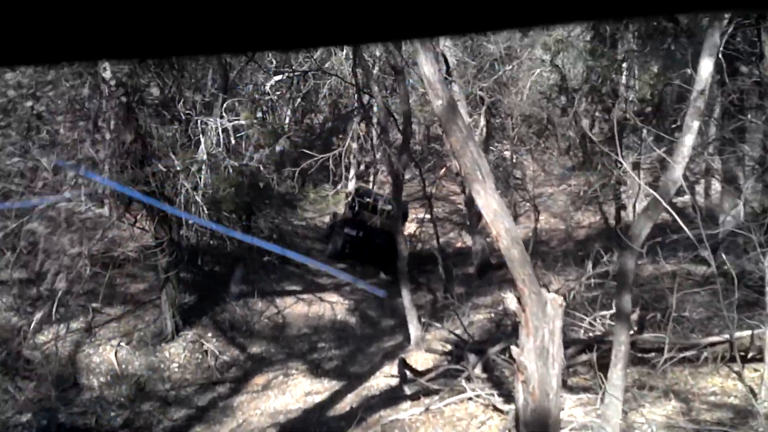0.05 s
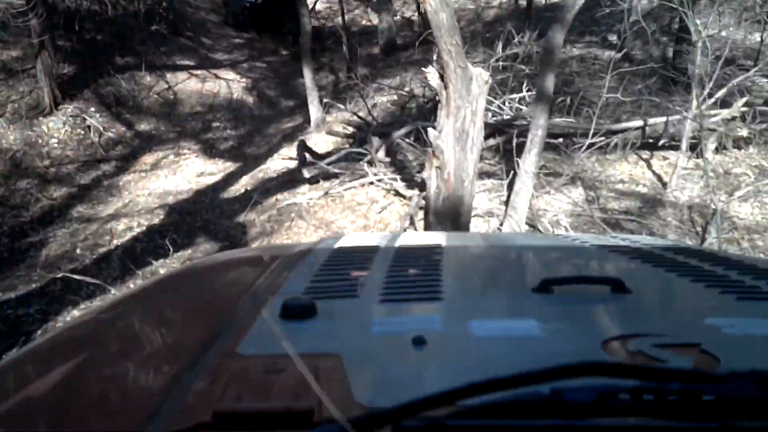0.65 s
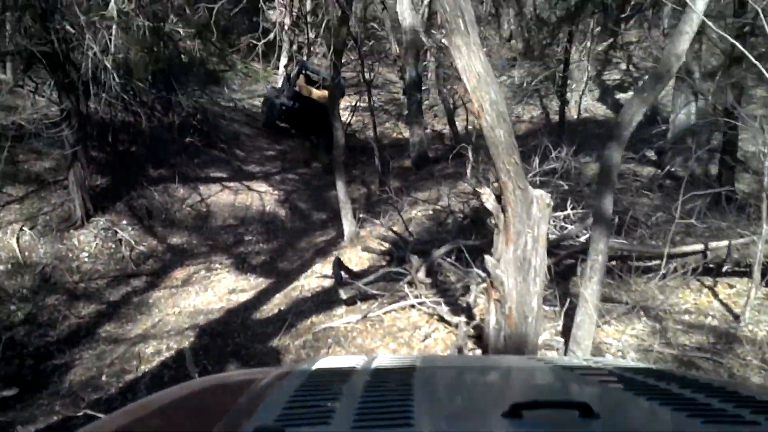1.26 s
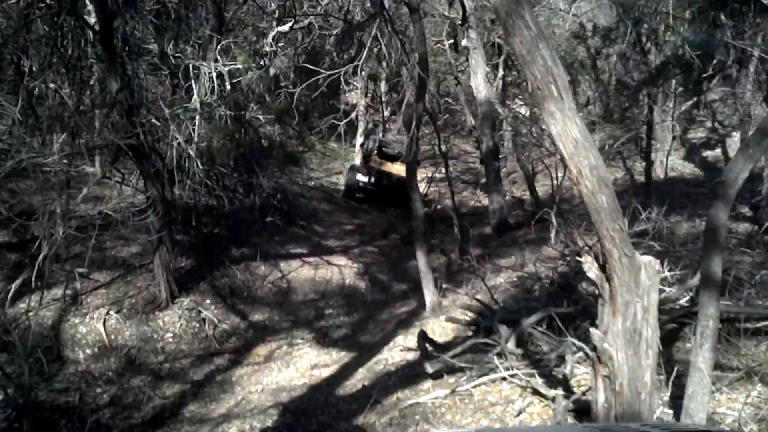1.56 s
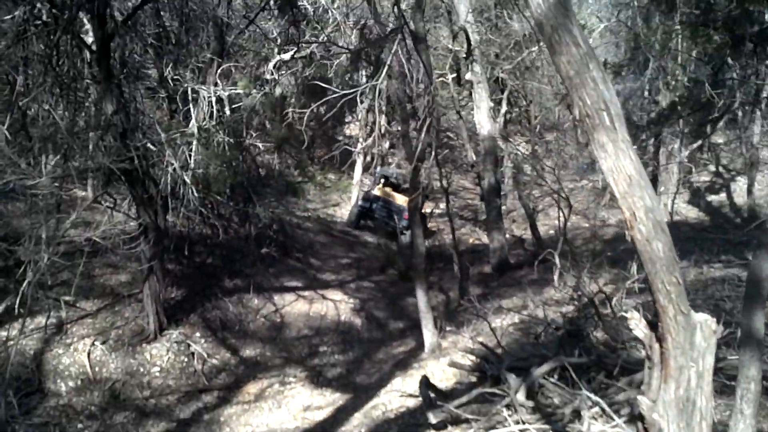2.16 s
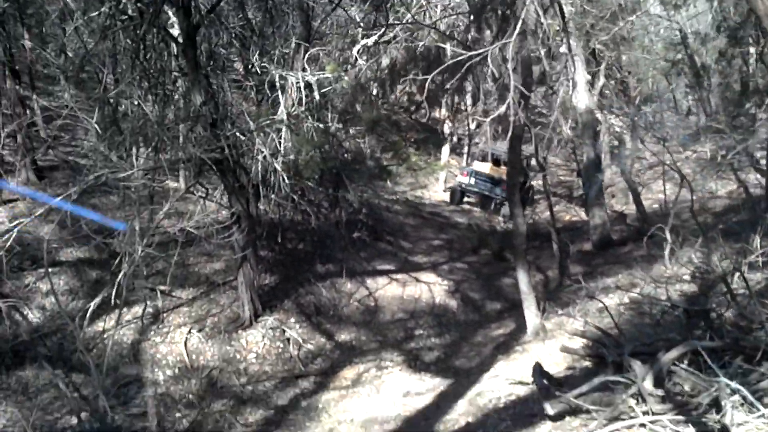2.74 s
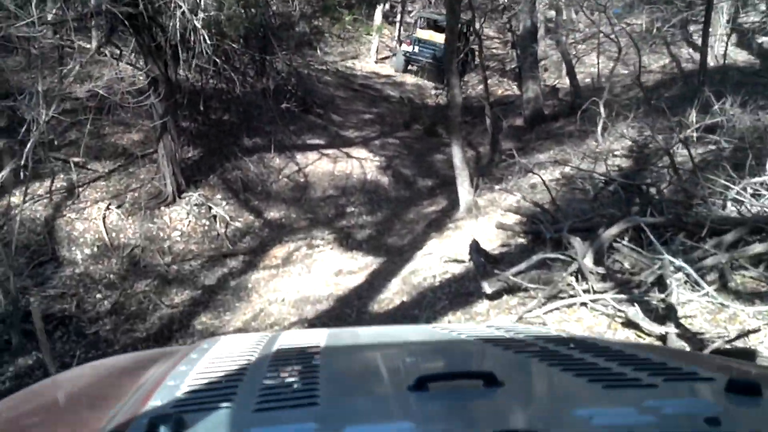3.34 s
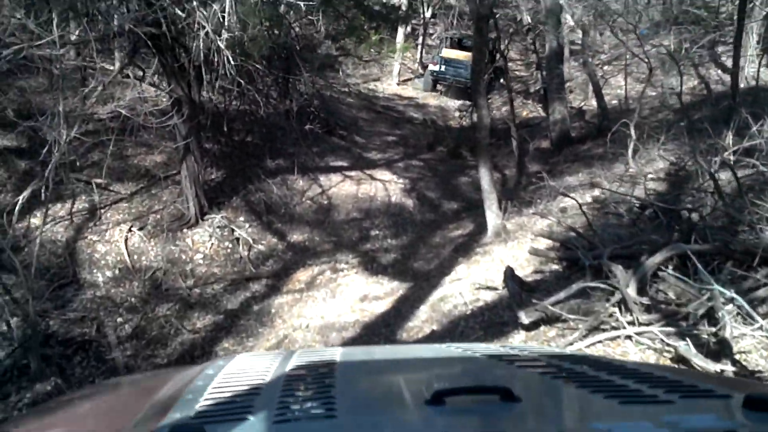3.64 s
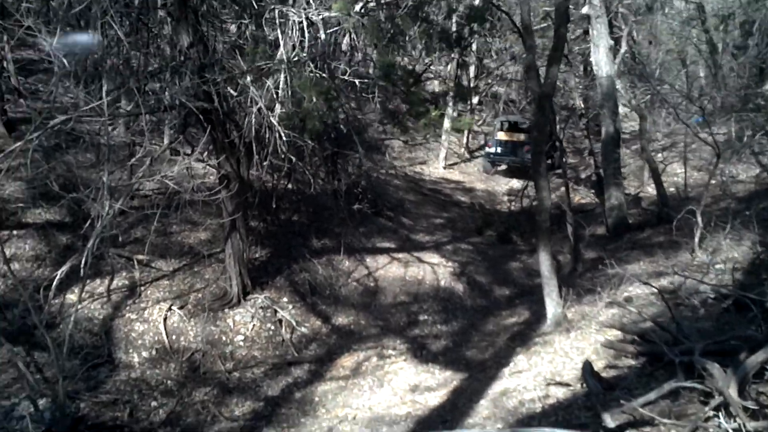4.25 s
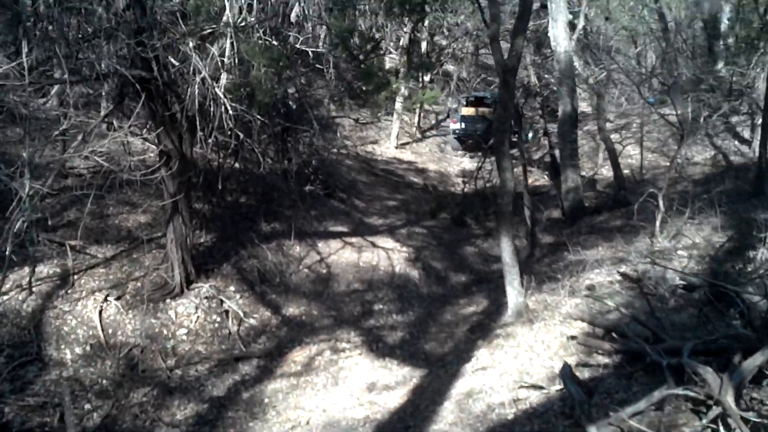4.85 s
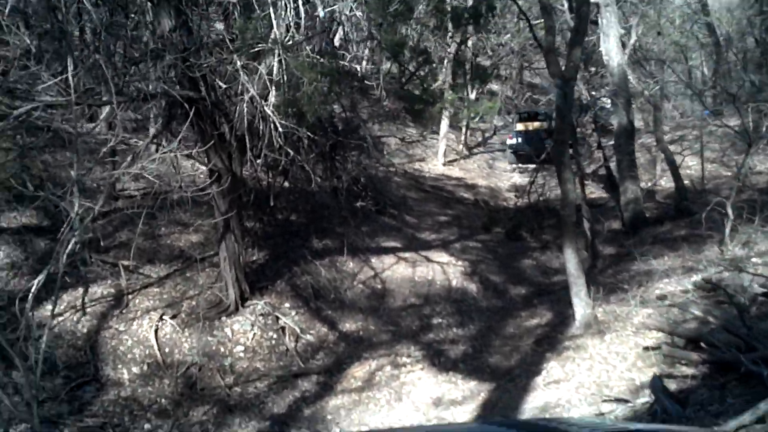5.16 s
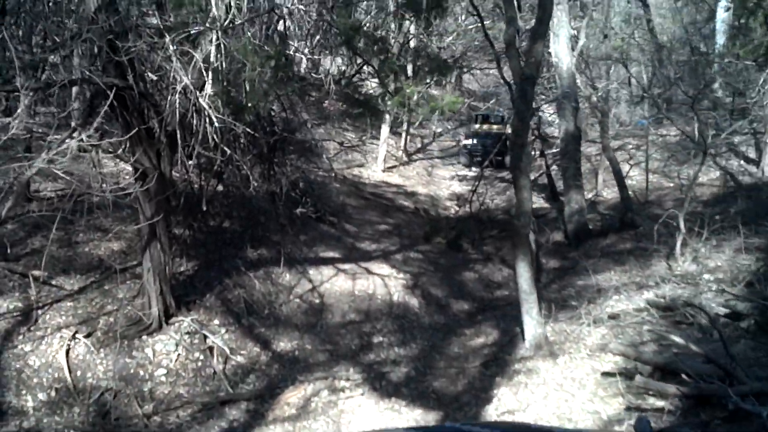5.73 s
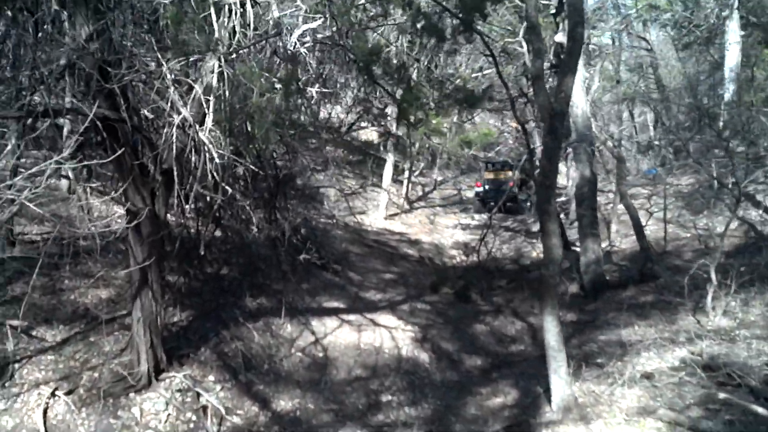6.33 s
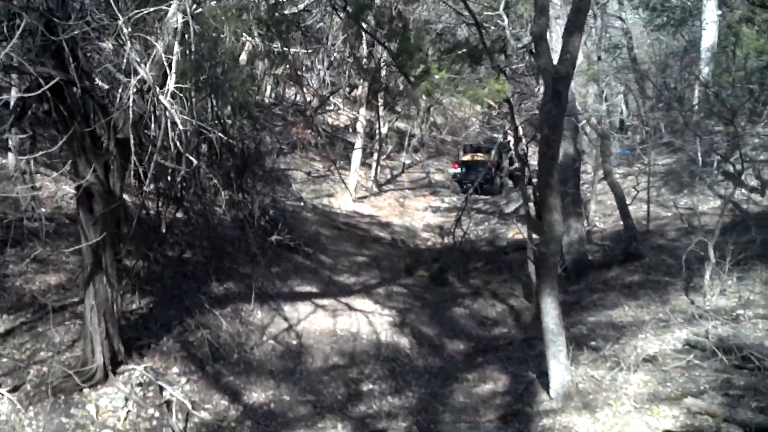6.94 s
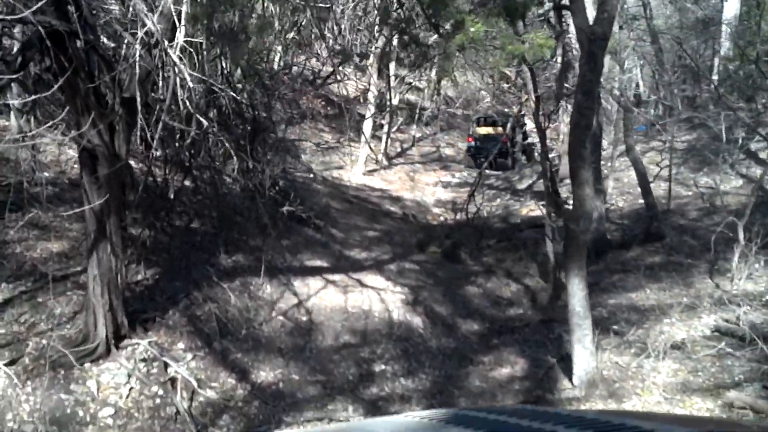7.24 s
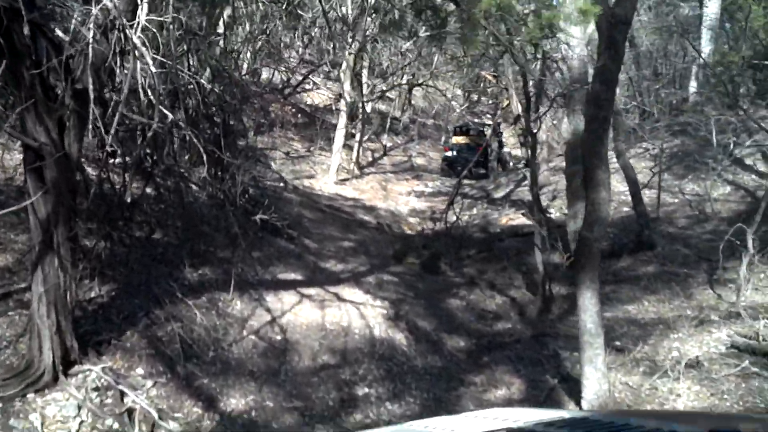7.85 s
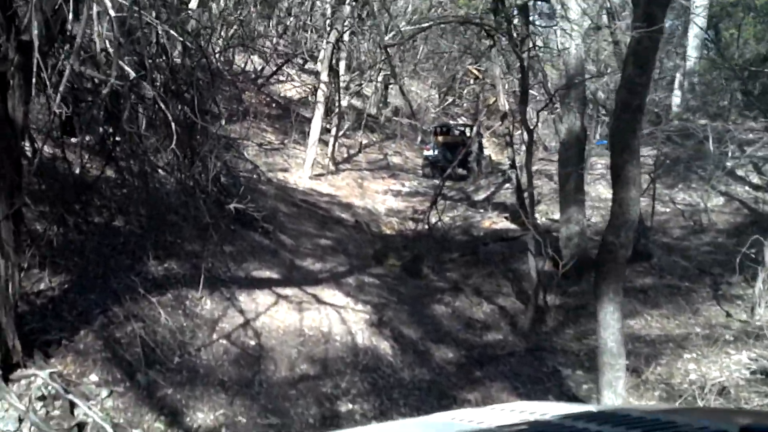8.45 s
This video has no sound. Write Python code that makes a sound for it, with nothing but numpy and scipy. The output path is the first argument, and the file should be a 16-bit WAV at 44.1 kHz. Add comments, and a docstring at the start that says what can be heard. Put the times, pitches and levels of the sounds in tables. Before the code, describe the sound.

An off-road vehicle's engine drones low as it crawls along a dirt trail, with twigs snapping, branches scraping and loose fittings knocking.

```python
"""Open off-road car on a wooded trail

Heard from the front seat at a crawl: the engine drones, the cab booms, tyres grind over dirt and dry leaves.
Twigs snap, branches scrape and foliage brushes the body; loose fittings knock, rubbing parts squeal.
A hand-held camera cross-feeds its two microphone ports; its gain ducks at hard knocks and creeps back."""
import sys
import numpy as np
from scipy import signal
from scipy.fft import rfft, irfft, next_fast_len
from scipy.io import wavfile
from scipy.ndimage import uniform_filter1d, map_coordinates

SR = 44100
rng = np.random.default_rng(int(sys.argv[2]) if len(sys.argv) > 2 else 0)


def inscribe(sig):
    """Save sig as 16-bit PCM at rate SR to the path in sys.argv[1].

    A 1-D sig is mono; a 2-D sig holds one channel per row.
    Samples are clipped to [-1, 1] before scaling.
    """
    pcm = np.round(np.clip(np.atleast_2d(sig).T, -1, 1) * 32767)
    wavfile.write(sys.argv[1], SR, pcm.astype(np.int16))


N = 378819


def amp(db):
    """Decibels to gain."""
    return 10 ** (np.asarray(db) / 20)


def unit(x):
    """x at rms 1."""
    return x / np.sqrt(np.mean(x ** 2) + 1e-20)


def along(points, hz):
    """Interpolate (f/Hz, value) points on a log axis."""
    freqs, values = np.transpose(points)
    return np.interp(np.log(hz + 1), np.log(freqs + 1), values)


def curves(rows):
    """One value per sample for each column after t/s."""
    times, *columns = np.transpose(rows)
    return [np.interp(np.arange(N) / SR, times, column) for column in columns]


def wobble(per_s):
    """Smooth random curve, per_s knots a second."""
    knots = rng.standard_normal(int(N * per_s / SR) + 4)
    return map_coordinates(knots, [np.arange(N) * per_s / SR])


def filtered(x, response):
    """x times a complex frequency response."""
    n = x.shape[-1]
    padded = next_fast_len(n + 4096)
    return irfft(rfft(x, padded) * response(np.fft.rfftfreq(padded, 1 / SR)), padded)[..., :n]


def coloured(x, spectrum):
    """x shaped by (f/Hz, level/dB) points, at rms 1."""
    return unit(filtered(x, lambda hz: amp(along(spectrum, hz))))


def loudness(x):
    """Rms of both channels over 6 ms."""
    power = uniform_filter1d(np.mean(x ** 2, axis=0), 265, mode="constant")
    return np.sqrt(np.abs(power) + 1e-12)


def add(track, at_s, x):
    """Mix x into the track."""
    part = track[:, max(round(at_s * SR), 0):][:, :x.shape[-1]]
    part += x[..., :part.shape[1]]


# likeness of the two ports: f/Hz, correlation
PORT_CORRELATION = [(60, 0.69), (150, 0.69), (350, 0.65), (600, 0.5), (1000, 0.69), (1600, 0),
                    (2500, 0.049)]
def port_noise(n):
    """White noise at two ports: alike in the bass, unrelated in the treble."""
    def mid_side(hz):
        angle = np.arccos(np.clip(along(PORT_CORRELATION, hz), -1, 1)) / 2
        return np.array([np.cos(angle), np.sin(angle)])
    mid, side = filtered(rng.standard_normal((2, n)), mid_side)
    return np.array([mid + side, mid - side])


def grains(per_s, spread_db, t60_s):
    """Envelope of many tiny fractures, at rms 1."""
    sizes = amp(spread_db * np.minimum(rng.exponential(size=N), 3))
    fractures = sizes * (rng.random(N) < per_s / SR)
    t = np.arange(SR // 10) / SR
    power = signal.fftconvolve(fractures ** 2, amp(-60 * t / t60_s) ** 2)[:N]
    return unit(np.sqrt(np.abs(power)))


def ringing(x, modes_db):
    """Each struck piece has its own modes: random peaks, wider towards the treble."""
    knots = rng.standard_normal(64)
    peaks = lambda hz: map_coordinates(knots, [22 * np.log1p(hz / 2500)])
    return filtered(x, lambda hz: amp(modes_db * np.minimum(hz / 1200, 1) * peaks(hz)))


def burst(spectrum, t60_s, attack_s, punch):
    """Hard first contact and a fast-dying ring; peak rms 1."""
    t = np.arange(SR // 4) / SR
    decay = amp(-60 * t / t60_s) + punch * np.exp(-t / 0.0013)
    ring = coloured(ringing(port_noise(len(t)), modes_db=3.5), spectrum)
    x = ring * (1 - np.exp(-t / attack_s)) * decay
    return x / loudness(x).max()


ENGINE_SPEED = [(0, 100.5), (.9, 98.5), (1.3, 99.6), (2.45, 99), (2.8, 95.3), (3.4, 98.8), (3.9, 97.3),
                (4.4, 99.6), (5.05, 97.5), (5.72, 103.5), (6.2, 100.6), (8.58, 99.3)]  # just above idle: t/s, firing f/Hz
ENGINE_LOAD = [(0, 3.5), (.35, 2.5), (.7, 1.5), (1.3, -1), (2.7, -1), (3.1, 0), (3.35, 4), (3.7, -0.5),
               (4.1, -3.5), (4.5, 8.5), (4.7, -6), (4.95, 10), (5.3, 2.5), (5.85, -1), (6.1, -2),
               (6.85, 4.5), (7.7, -3.5), (8.58, 1)]  # pull: t/s, load/dB
FIRING_LEVEL = [(0, -33), (2.2, -31), (2.9, -32.5), (3.35, -40.5), (4.15, -25.5), (4.8, -36), (6.2, -37.5),
                (6.7, -43), (8.58, -34.5)]  # firing tone: t/s, level/dB
BOOM_LEVEL = [(0, -34), (1.6, -34.5), (2.5, -32.5), (2.8, -23.5), (3.1, -33.5), (3.5, -31), (4.1, -33.5),
              (4.45, -22), (4.7, -32), (5.0, -22.5), (5.35, -28.5), (5.6, -19.5), (5.82, -25), (5.95, -24),
              (6.2, -24), (6.85, -29.5), (7.12, -23.5), (7.42, -25), (7.6, -19), (7.73, -28.5), (8.15, -26),
              (8.32, -26.5), (8.5, -21.5)]  # cab boom: t/s, level/dB
RUMBLE_SPECTRUM = [(20, -50), (50, -34), (70, -14), (95, -3.5), (130, -14), (165, 2.5), (215, -2), (245, 1),
                   (300, 0), (335, -5.5), (380, -2), (440, -8.5), (600, -19.5), (3000, -85)]  # exhaust and chassis: f/Hz, level/dB
def engine(cab_hz=282.7):
    """Firing harmonics swell with load; uneven pulses shake the chassis and set the cab booming."""
    def tone(phase, flutter_db, per_s):
        return unit(np.sin(phase) * amp(flutter_db * wobble(per_s)))
    (firing_hz,), (load_db,) = curves(ENGINE_SPEED), curves(ENGINE_LOAD)
    (firing_db,), (boom_db,) = curves(FIRING_LEVEL), curves(BOOM_LEVEL)
    phase = 2 * np.pi * np.cumsum(firing_hz) / SR + 0.34 * wobble(14)
    firing = amp(firing_db) * tone(phase, flutter_db=1.6, per_s=16)
    octave = amp(-32 + 1.22 * load_db) * tone(2 * phase + wobble(22), flutter_db=4.6, per_s=20)
    cab_phase = 2 * np.pi * cab_hz * np.arange(N) / SR + wobble(9) + 0.35 * wobble(35)
    boom = amp(boom_db) * tone(cab_phase, flutter_db=4.6, per_s=22)
    growl = amp(-42.5 + 0.57 * load_db) * tone(4 * phase + 0.6 * wobble(20), flutter_db=4.5, per_s=20)
    puffs = 1 + 0.2 * np.cos(phase)
    rumble_db = -26.5 + 0.12 * load_db + 1.36 * wobble(12)
    rumble = amp(rumble_db) * coloured(port_noise(N) * puffs, RUMBLE_SPECTRUM)
    return filtered(firing + octave + growl + boom + rumble, engine_path)


ENGINE_BALANCE = [(50, -10), (95, -9), (190, -4.5), (283, -10), (400, -2.5), (700, -5)]  # at the ports: f/Hz, left-right/dB
ENGINE_PHASE = [(50, 0.9), (100, 2.08), (160, 1), (200, 0.45), (283, 0.77), (380, 1.14), (700, 0.46)]  # at the ports: f/Hz, left lead/rad
def engine_path(hz):
    """The engine reaches the left port earlier and the right one louder."""
    left = amp(along(ENGINE_BALANCE, hz) / 2) * np.exp(0.5j * along(ENGINE_PHASE, hz))
    return np.array([left, 1 / left]) / np.sqrt((abs(left) ** 2 + abs(left) ** -2) / 2)


GROUND_LEVELS = [(0, -27, -38.5), (.3, -29.5, -42.5), (.8, -27, -36.5), (1.35, -28, -42),
                 (2.25, -31, -47.5), (2.55, -27, -39.5), (2.72, -23.5, -33.5), (2.85, -28.5, -42.5),
                 (3.05, -26.5, -38), (3.6, -29.5, -38.5), (4.25, -28, -43), (4.65, -32.5, -46.5),
                 (5.4, -31.5, -47), (5.9, -30.5, -38), (6.1, -33, -44.5), (6.55, -30.5, -47),
                 (7.4, -33, -52), (7.65, -30, -49.5), (7.9, -32, -53.5), (8.58, -32.5, -51)]  # under the tyres: t/s, dirt level/dB, leaf level/dB
DIRT_SPECTRUM = [(200, -20), (380, -0.5), (480, 7.5), (600, 6), (750, 3.5), (950, 1), (1300, -1),
                 (1850, -2.5), (2300, -8.5), (2800, -14), (4000, -21.5), (12000, -49)]  # grinding dirt: f/Hz, level/dB
LEAF_SPECTRUM = [(1000, -23), (2200, -5.5), (3000, 4), (3700, 5), (4800, -2.5), (5600, 0), (6800, -2),
                 (8500, -2), (10500, -6.5), (12500, -11.5), (14800, -20), (15800, -34)]  # dry leaves: f/Hz, level/dB
ROLL_SPECTRUM = [(60, -50), (105, -7), (135, -1), (165, -0.5), (220, -14.5), (330, -5.5), (420, -12.5),
                 (700, -49)]  # tread through the suspension: f/Hz, level/dB
def tyres():
    """Dirt grinds and leaves crackle over the tread's low roll; uneven ground varies the pressure."""
    dirt_db, leaf_db = curves(GROUND_LEVELS)
    bumps = amp(0.78 * wobble(per_s=7.3))
    dirt = unit(1.26 + grains(per_s=150, spread_db=0, t60_s=0.069))
    leaves = unit(2.1 + grains(per_s=160, spread_db=7, t60_s=0.045))
    grind = amp(dirt_db) * coloured(port_noise(N) * dirt, DIRT_SPECTRUM)
    rustle = amp(leaf_db) * coloured(port_noise(N) * leaves, LEAF_SPECTRUM)
    roll = amp(dirt_db - 4) * coloured(port_noise(N), ROLL_SPECTRUM)
    return bumps * (cab_echoes(grind + rustle, echo_db=-11.5, t60_s=0.17) + roll)


def cab_echoes(x, echo_db, t60_s, low_cut_hz=500):
    """Early echoes off windscreen, dashboard and roll bars comb the sound."""
    t = np.arange(SR // 25) / SR
    echoes = rng.standard_normal(len(t)) * amp(-60 * t / t60_s) * (t > 0.003)
    wet = signal.fftconvolve(x, echoes[None] / np.linalg.norm(echoes), axes=1)[:, :N]
    return x + amp(echo_db) * filtered(wet, lambda hz: hz ** 2 / (hz ** 2 + low_cut_hz ** 2))


def stems(count, spread_db=10):
    """Tiny stems break at random under the tread, louder where leaves lie thick."""
    out = np.zeros((2, N))
    _, leaf_db = curves(GROUND_LEVELS)
    for when, size, colour, side in rng.random((count, 4)):
        at = int(when * N)
        db = leaf_db[at] + spread_db * size ** 2
        crack = snap(db, tilt_db_oct=2.5 * (2 * colour - 1), t60_s=0.02, side_db=8 * (2 * side - 1))
        add(out, at / SR, crack)
    return out


WOOD_SPECTRUM = [(500, -10), (1200, -4.5), (2200, 2), (3600, 3.5), (5200, -2), (7000, -2), (9000, -3),
                 (12000, -11), (15500, -26)]  # breaking wood: f/Hz, level/dB
def snap(db, tilt_db_oct, t60_s, side_db):
    """One break of dry wood: sharp crack, short ring, tilted above 1900 Hz."""
    spectrum = [(hz, level + tilt_db_oct * np.log2(max(hz / 1900, 1))) for hz, level in WOOD_SPECTRUM]
    sides = unit(amp([[side_db / 2], [-side_db / 2]]))
    return amp(db) * sides * burst(spectrum, t60_s, attack_s=0.0002, punch=0.45)


# breaking twigs: t/s, level/dB, tilt/(dB/octave), t60/s, left-right/dB
TWIG_SNAPS = [(0.312, -23.5, -6.5, 0.076, -16), (0.329, -27, -6, 0.2, 6), (0.831, -24, -4, 0.051, -2),
              (1.215, -21, -12, 0.24, 5), (1.424, -31, 0, .05, -4), (2.299, -42, -9, .04, 0),
              (2.333, -34.5, 4.5, 0.096, -1), (2.407, -28.5, 0.5, 0.069, -6), (2.514, -31, -4, .04, 2),
              (2.566, -27.5, -5, .04, -2), (2.667, -24.5, -2.5, 0.14, -2), (2.698, -32, 0, 0.049, -3),
              (3.14, -31, 8, .04, 2), (3.374, -25, 5, 0.083, -6), (3.435, -37, 10, .04, -2),
              (3.501, -28, -10, 0.032, -1), (3.547, -33, 0, .035, 0), (3.662, -25, 3, 0.029, -13),
              (3.683, -24, 0.5, 0.11, 0), (3.854, -35, 18, .04, -3), (3.86, -27, 3, 0.079, 0),
              (3.929, -33.5, 17, 0.066, 4), (4.012, -12, -0.5, 0.079, 4), (4.049, -27, -3.5, 0.053, -3),
              (4.213, -29.5, -2, 0.086, 4), (4.249, -28.5, -3, 0.083, 3), (4.27, -33, -0.5, .035, 2),
              (4.301, -34, -5, 0.046, 0), (4.384, -30.5, 3, 0.062, 2), (4.533, -23, 11, 0.086, 2),
              (4.615, -29.5, 8, 0.073, 0), (4.745, -32, 6, 0.046, -8), (4.776, -29, -5, 0.066, -2),
              (5.322, -32.5, 0, 0.034, 4), (5.338, -30, 0, 0.049, 12), (5.563, -31.5, -1.5, 0.098, -6),
              (5.579, -20.5, 7, 0.051, -3), (5.625, -33.5, 4, 0.13, -8), (5.744, -26.5, 2, 0.069, 0),
              (5.761, -22, 3.5, 0.07, 10), (5.788, -29.5, 1, 0.14, -3), (5.837, -31, 6, 0.068, -2),
              (6.06, -36, 3.5, 0.065, 1), (6.67, -35.5, -6, .04, -2), (6.874, -35.5, -6, 0.036, 0),
              (6.974, -39, -2, .03, -2), (7.019, -28, -3, 0.13, 15), (7.044, -39, 0, 0.045, 3),
              (7.149, -27, -4.5, .055, -18), (7.587, -29, -3, 0.088, -6), (7.629, -24.5, -2, 0.13, -6),
              (7.655, -33, 0, 0.051, -2), (7.72, -21, -3.5, .07, -1), (7.73, -23, -3, 0.054, 6)]
def twigs():
    """Dry wood cracks: thin twigs bright, thick sticks dull."""
    out = np.zeros((2, N))
    for at_s, db, tilt_db_oct, t60_s, side_db in TWIG_SNAPS:
        add(out, at_s, snap(db, tilt_db_oct, t60_s, side_db))
    return out


RESONANCE_SHAPE = [(.08, -49), (.3, -17), (.7, 0.5), (1, 3.5), (1.45, -4), (2.4, -12), (5, -24.5),
                   (12, -43)]  # wood or panel: f/centre, level/dB
def resonance(centre_hz):
    """Spectrum of one broad wood or panel resonance."""
    return [(centre_hz * ratio, db) for ratio, db in RESONANCE_SHAPE]


# drags along the car: t/s, level/dB, centre f/Hz, length/s, rise/s
DRAGS = [(0.325, -16.5, 830, 0.055, 0.00081), (3.381, -19.5, 1120, 0.026, .02),
         (3.799, -17.5, 1320, 0.04, 0.00091), (4.009, -18, 1480, 0.025, .001),
         (4.413, -18.5, 1110, 0.026, 0.023), (5.011, -23.5, 1200, 0.03, 0.013),
         (5.435, -24, 1300, 0.027, 0.00086), (5.748, -15, 1730, 0.02, 0.011),
         (5.79, -22, 1590, 0.007, .002), (6.166, -28.5, 1140, 0.042, .001), (7.717, -28, 1400, 0.018, .001)]
def scrapes(release_t60_s=0.064):
    """A branch or stone catches or swells, chatters in one broad resonance, then dies away."""
    out = np.zeros((2, N))
    t = np.arange(SR // 4) / SR
    for at_s, db, centre_hz, length_s, rise_s in DRAGS:
        catch = (1 - np.exp(-t / rise_s)) * (1 + np.exp(-t / 0.029))
        stroke = amp(-60 * np.maximum(t - length_s, 0) / release_t60_s - 3 * t / length_s)
        chatter = amp(0.84 * map_coordinates(rng.standard_normal(len(t)), [t * 350]))
        friction = coloured(ringing(port_noise(len(t)), modes_db=0.5), resonance(centre_hz))
        rasp = friction * catch * stroke * chatter
        add(out, at_s, amp(db) * rasp / loudness(rasp).max())
    return out


# loose fittings: t/s, thud level/dB, clack level/dB, clack f/Hz, crack level/dB, t60/s, clean share
FITTING_KNOCKS = [(0.501, -24, -18.5, 1020, -27.5, 0.08, 0), (0.5467, 3, 5.5, 698, -3.5, 0.062, 0.86),
                  (.645, -11.5, -13.5, 715, -9.5, 0.078, 0.03), (.652, -8.5, -15, 600, -14, .06, .2),
                  (0.782, -24, -16.5, 890, -26, 0.028, 0.03), (.812, -23, -17, 980, -16.5, 0.055, 0.3),
                  (.858, -30, -22, 915, -20, 0.12, 0), (.974, -11.5, -5.5, 800, -12, 0.072, .2),
                  (2.466, -20, -19.5, 514, -34, 0.051, .5), (2.7918, -20, -10, 730, -23, 0.05, 0.23),
                  (3.678, -34, -18.5, 780, -30, 0.016, 0.04), (4.534, -16, -22, 603, -22, 0.045, 0.25),
                  (5.861, -19, -14.5, 1550, -15.5, 0.056, 0), (5.88, -4.5, -2.5, 1570, -1, 0.062, 0),
                  (6.777, -37, -23, 830, -43, 0.058, 0.5), (7.358, -26, -19.5, 720, -53, 0.045, 0.5)]
JUDDER_SPECTRUM = [(20, -60), (80, -30), (130, -21), (250, 1.5), (350, 5), (500, -9.5), (700, -21),
                   (2500, -72)]  # dull judder of a panel: f/Hz, level/dB
CRACK_SPECTRUM = [(1000, -9.5), (2200, 7), (3600, 4), (5200, -4.5), (7000, -2), (9500, -5), (12000, -11),
                  (15500, -31)]  # bright crack of a knock: f/Hz, level/dB
def knocks():
    """A fitting strikes: panel thud, a clack between clean rap and rattle, and a bright crack."""
    out = np.zeros((2, N))
    for at_s, thud_db, clack_db, clack_hz, crack_db, t60_s, clean in FITTING_KNOCKS:
        rattle = burst(resonance(clack_hz), t60_s, attack_s=0.0036, punch=0.59)
        judder = burst(JUDDER_SPECTRUM, 1.7 * t60_s, attack_s=0.0017, punch=0.36)
        clack = np.sqrt(clean) * rap(clack_hz) + np.sqrt(1 - clean) * rattle
        add(out, at_s, amp(thud_db) * (thud() + amp(-3) * judder))
        add(out, at_s, amp(clack_db) * clack)
        add(out, at_s, amp(crack_db) * burst(CRACK_SPECTRUM, t60_s, attack_s=0.0013, punch=0.62))
    return filtered(out, knock_low_cut)


PANEL_MODES = [(134, -19, .07), (222, -15, .06), (264, 4.5, 0.045), (314, -4.5, 0.048), (483, -0.5, 0.06)]  # floor and dashboard: f/Hz, level/dB, t60/s
def thud(attack_s=0.0045, scatter_db=2, side_db=8):
    """A heavy blow rings the cab's low panel modes; peak rms 1."""
    t = np.arange(SR // 4) / SR
    ring = sum(np.sin(2 * np.pi * hz * t) * amp(db + scatter_db * rng.standard_normal() - 60 * t / t60_s)
               for hz, db, t60_s in PANEL_MODES)
    x = ring * (1 - np.exp(-t / attack_s)) * amp([[side_db / 2], [-side_db / 2]])
    return x / loudness(x).max()


FITTING_MODES = [(.72, -0.5, 0.03), (1, 7, 0.026), (1.5, 2.5, 0.016)]  # stiff fitting: f/clack pitch, level/dB, t60/s
def rap(hz):
    """A clean blow briefly rings a stiff fitting's modes; peak rms 1."""
    t = np.arange(SR // 4) / SR
    ring = sum(np.sin(2 * np.pi * hz * ratio * t) * amp(db - 60 * t / t60_s)
               for ratio, db, t60_s in FITTING_MODES)
    x = np.tile(ring, (2, 1))
    return x / loudness(x).max()


def knock_low_cut(hz, corner_hz=75):
    """Second-order high-pass: the knocks carry little at the lowest frequencies."""
    s = 1j * hz / corner_hz
    return s ** 2 / (s ** 2 + s + 1)


BOUGH_SWISHES = [(1.145, 0.076, -33.5), (1.78, 0.051, -41), (4.073, 0.19, -38.5), (4.987, 0.14, -46.5),
                 (8.562, 0.18, -48)]  # passing boughs: middle t/s, length/s, level/dB
SWISH_SPECTRUM = [(1500, -40), (5000, -4), (8500, 4), (11000, -0.5), (15500, -14)]  # sliding leaves: f/Hz, level/dB
def foliage():
    """Leafy boughs swell into a thin hiss as they slide along the body."""
    t = np.arange(N) / SR
    touch = sum(amp(db) * np.exp(-(2 * (t - middle_s) / length_s) ** 2)
                for middle_s, length_s, db in BOUGH_SWISHES)
    leaves = unit(0.5 + grains(per_s=200, spread_db=5, t60_s=0.032))
    return touch * coloured(port_noise(N) * leaves, SWISH_SPECTRUM)


# rubbing parts: t/s, length/s, f/Hz, level/dB, relative pitch jitter, extra fade/dB
RUB_SQUEALS = [(7.15, 0.19, 7050, -43, .016, 13), (8.336, 0.57, 672, -31.5, .012, 2)]
def squeals(attack_s=0.015):
    """Rubbing parts sing one unsteady note, gripping and slipping as they fade."""
    out = np.zeros((2, N))
    for at_s, length_s, hz, db, jitter, fade_db in RUB_SQUEALS:
        t = np.arange(int(length_s * SR)) / SR
        pitch_hz = hz * (1 + jitter * wobble(600)[:len(t)])
        phase = 2 * np.pi * np.cumsum(pitch_hz) / SR
        swell = (1 - np.exp(-t / attack_s)) * np.sqrt(1 - t / length_s)
        grip = amp(3 * wobble(60)[:len(t)] - fade_db * t / length_s)
        add(out, at_s, amp(db) * swell * grip * np.sin(phase))
    return out


PORT_BALANCE = [(400, -1), (1000, -1.5), (2000, -3), (10000, -5)]  # all sound at the ports: f/Hz, left-right/dB
def scene():
    """All sources at the two ports, leaning right."""
    def balance(hz):
        left = amp(along(PORT_BALANCE, hz))
        return np.array([left, np.ones_like(hz)]) / np.sqrt((1 + left ** 2) / 2)
    sound = engine() + tyres() + knocks() + twigs() + stems(count=125) + scrapes() + foliage() + squeals()
    return filtered(sound, balance)


CROSS_SHARE = [(600, 0.051), (1200, 0.69), (2300, 1), (12000, 1)]  # port cross-feed: f/Hz, share subtracted
def widen(x, delay_s=0.00038):
    """Each channel subtracts the opposite port, delayed by the travel time between them."""
    share = lambda hz: np.clip(along(CROSS_SHARE, hz), 0, 1)
    crossed = filtered(x[::-1], lambda hz: share(hz) * np.exp(-2j * np.pi * hz * delay_s))
    return filtered(x - crossed, lambda hz: 1 / np.sqrt(1 + share(hz) ** 2))


def gain_control(x, ceiling_db, recovery_db_per_s):
    """Gain drops at once to hold the rms ceiling, then creeps back."""
    ramp_db = recovery_db_per_s * np.arange(N) / SR
    excess_db = np.maximum(20 * np.log10(loudness(x)) - ceiling_db, 0)
    return x * amp(ramp_db - np.maximum.accumulate(excess_db + ramp_db))


def record(dry):
    """Stereo widening, gain control, full-scale clipping, band limit."""
    held = gain_control(widen(dry), ceiling_db=-8, recovery_db_per_s=3.305)
    return filtered(np.clip(held, -1, 1), lambda hz: hz < 15850)


dry = scene()
out = record(dry)
inscribe(out)
```